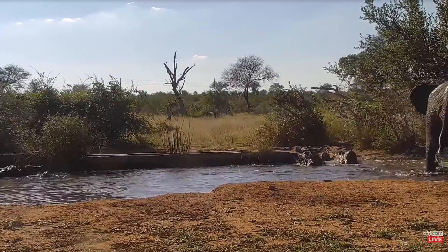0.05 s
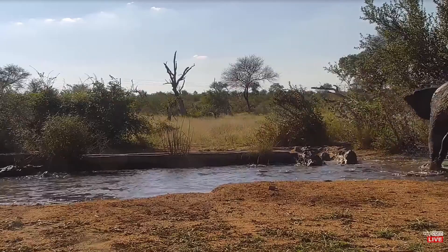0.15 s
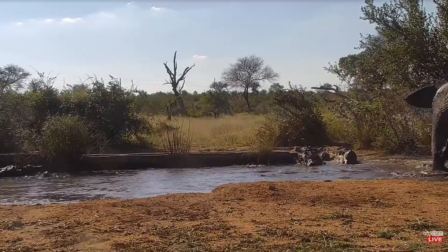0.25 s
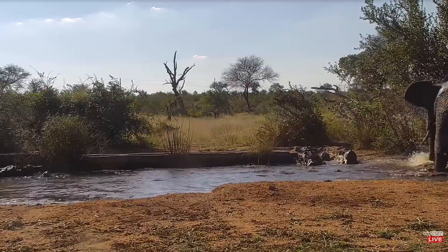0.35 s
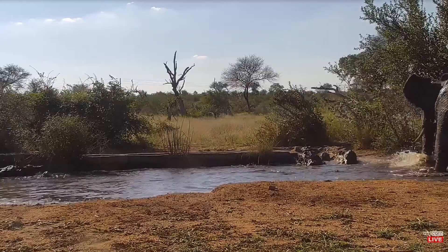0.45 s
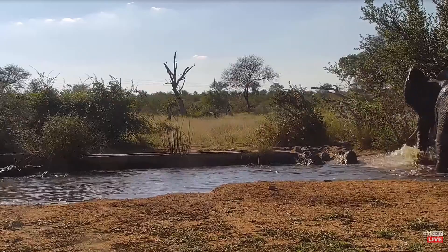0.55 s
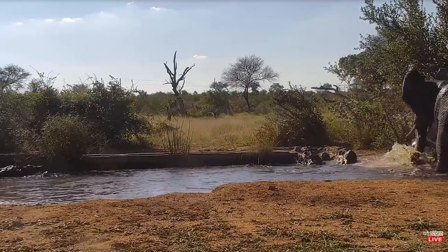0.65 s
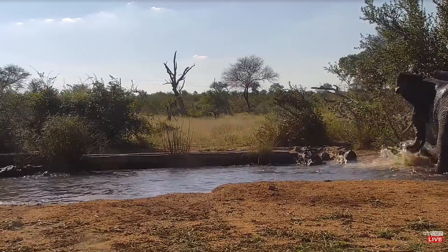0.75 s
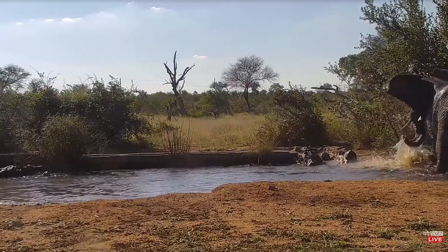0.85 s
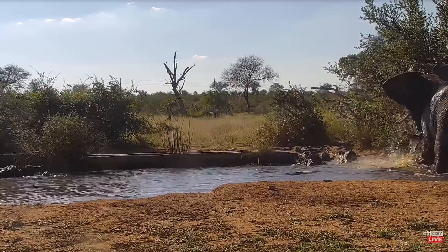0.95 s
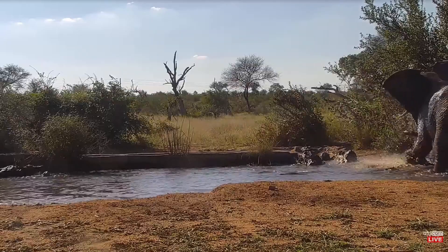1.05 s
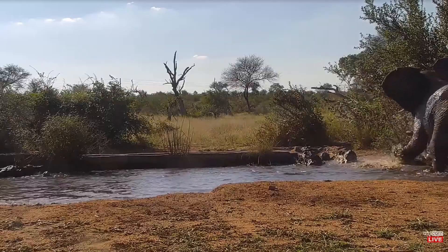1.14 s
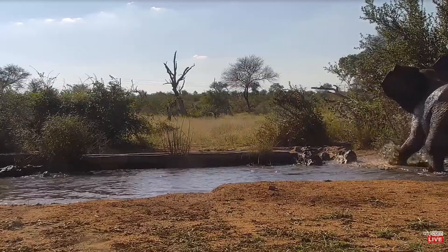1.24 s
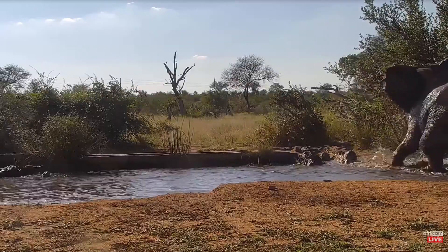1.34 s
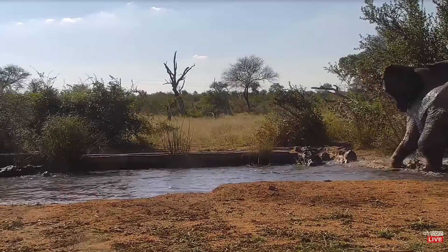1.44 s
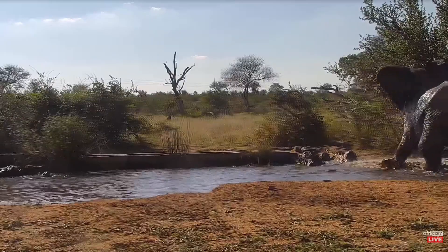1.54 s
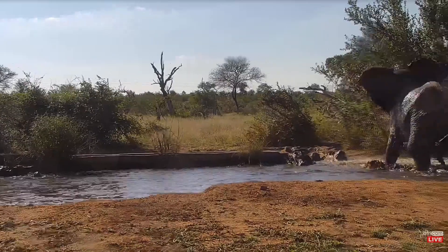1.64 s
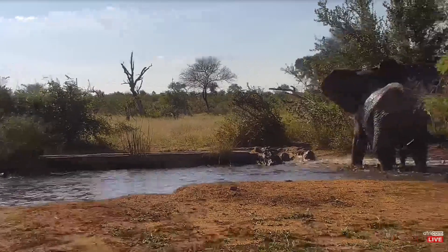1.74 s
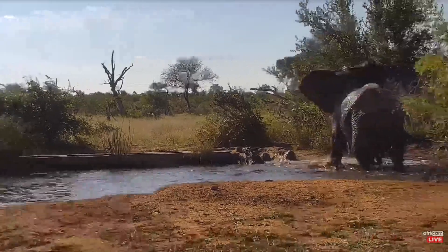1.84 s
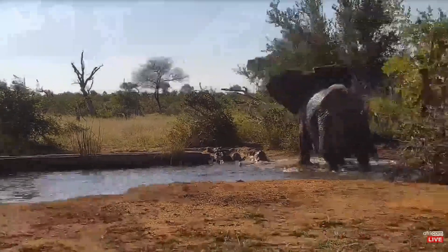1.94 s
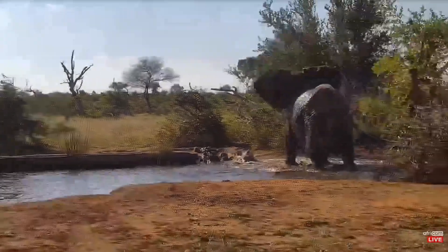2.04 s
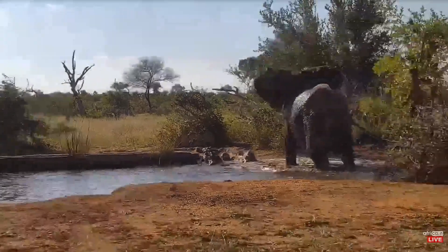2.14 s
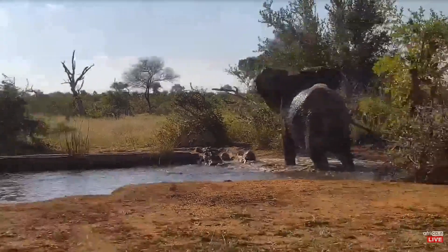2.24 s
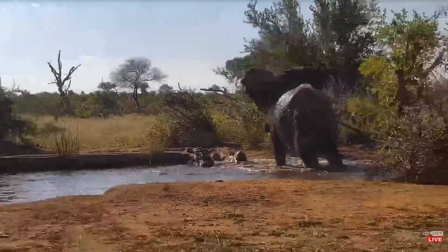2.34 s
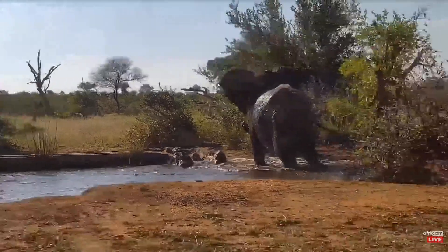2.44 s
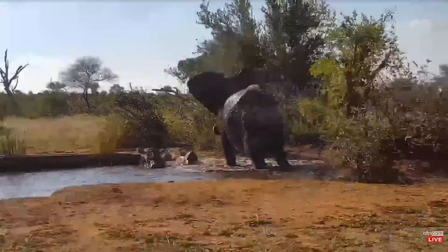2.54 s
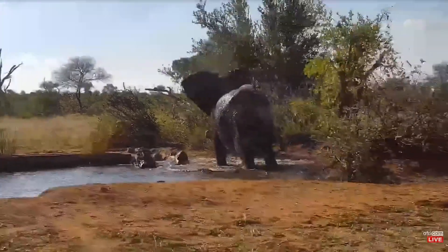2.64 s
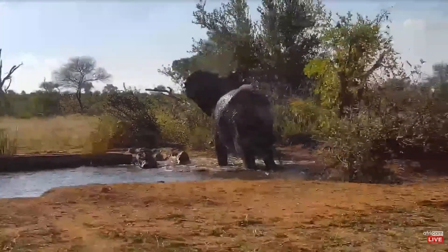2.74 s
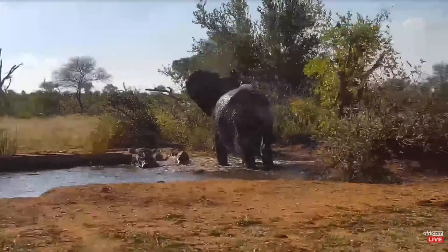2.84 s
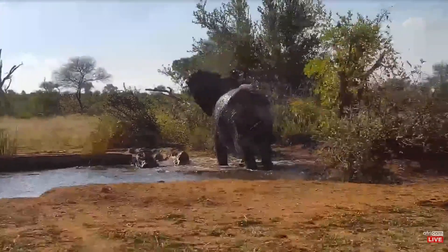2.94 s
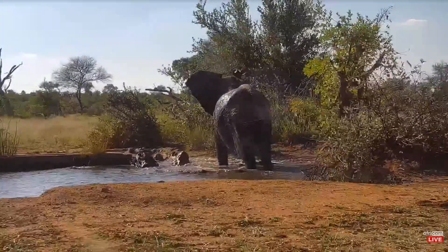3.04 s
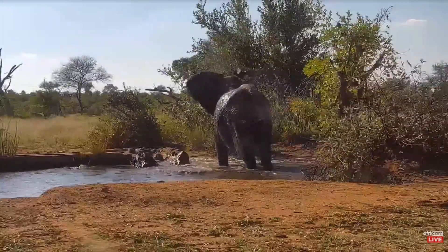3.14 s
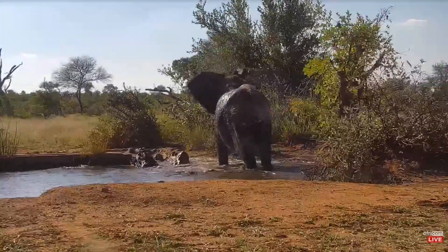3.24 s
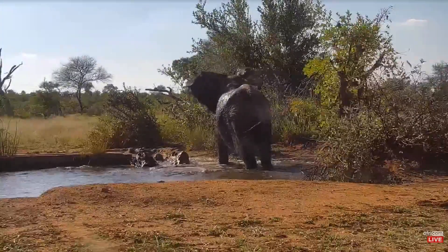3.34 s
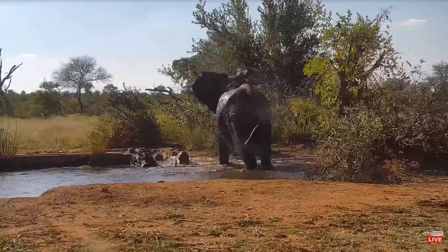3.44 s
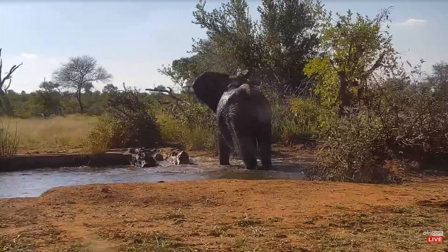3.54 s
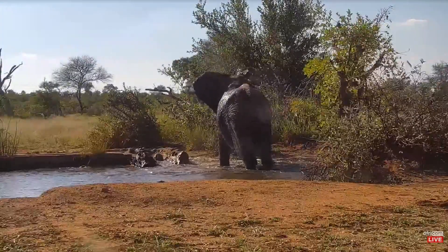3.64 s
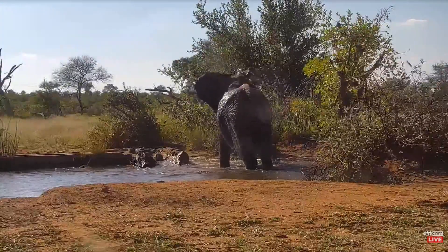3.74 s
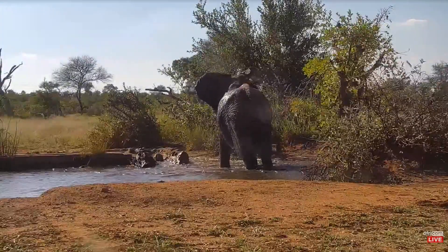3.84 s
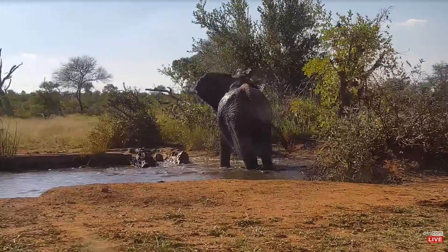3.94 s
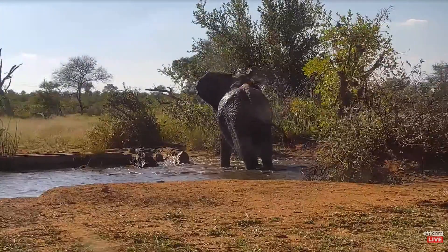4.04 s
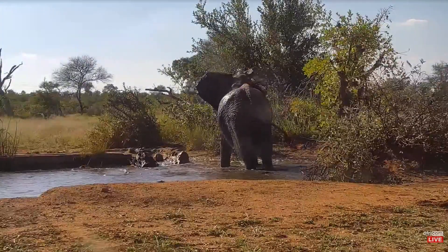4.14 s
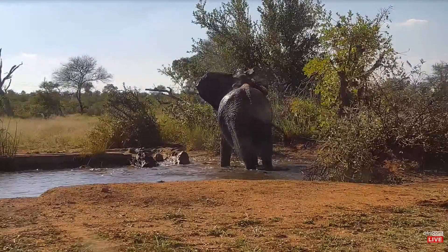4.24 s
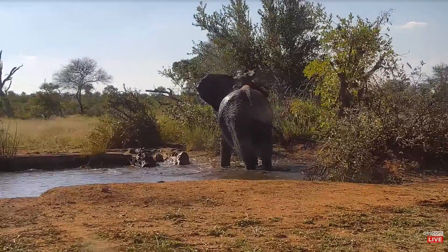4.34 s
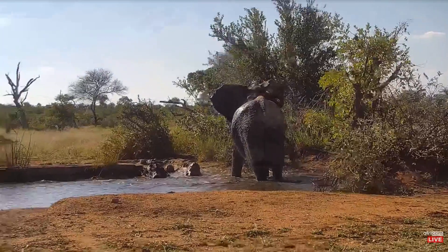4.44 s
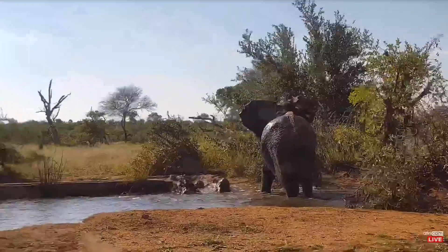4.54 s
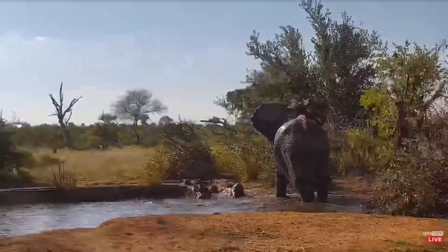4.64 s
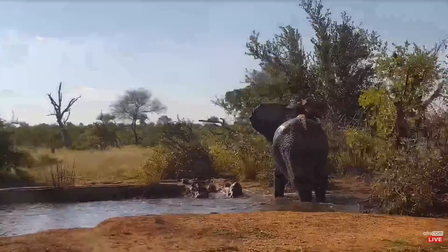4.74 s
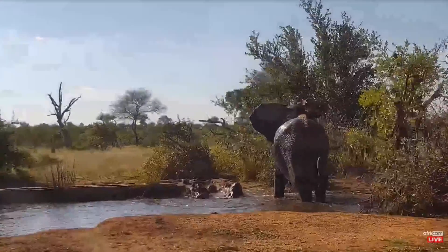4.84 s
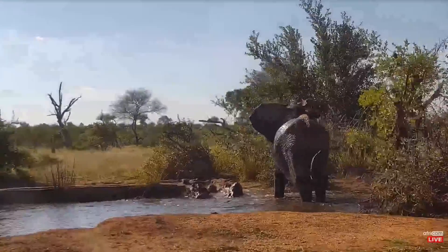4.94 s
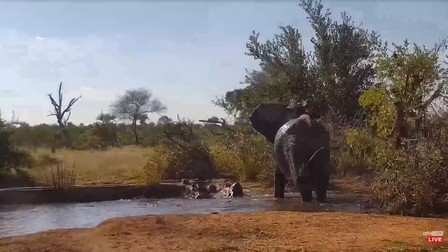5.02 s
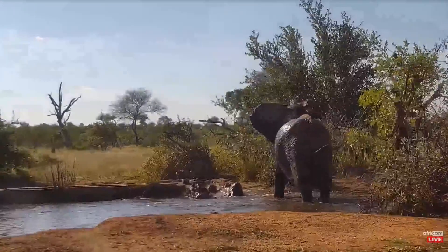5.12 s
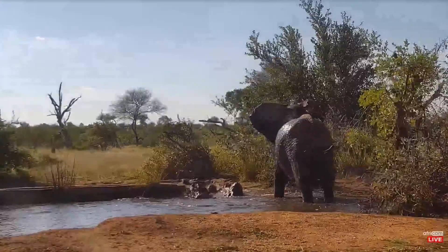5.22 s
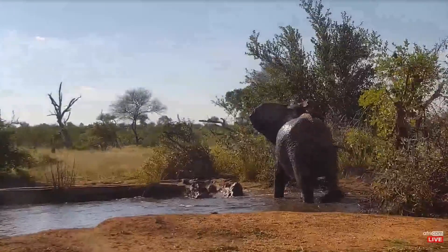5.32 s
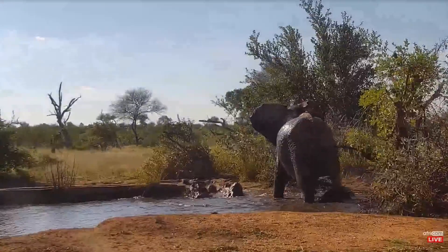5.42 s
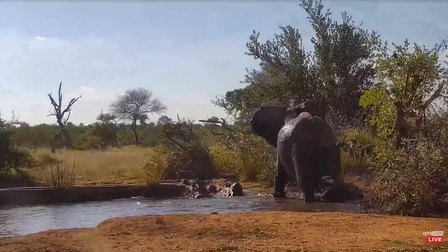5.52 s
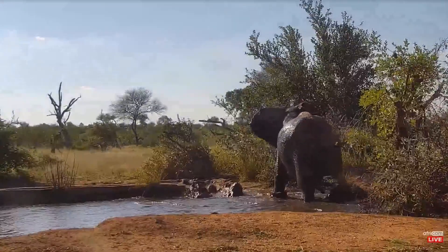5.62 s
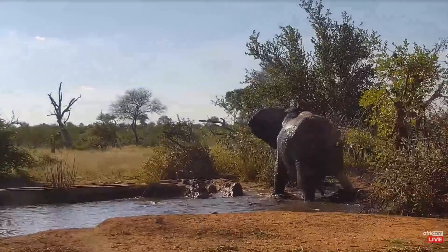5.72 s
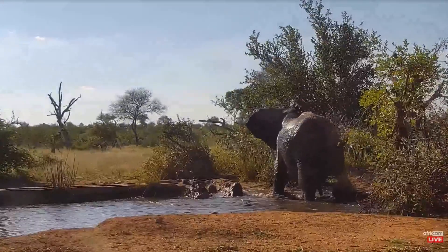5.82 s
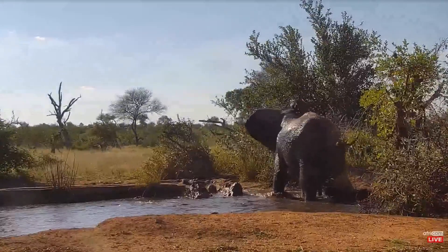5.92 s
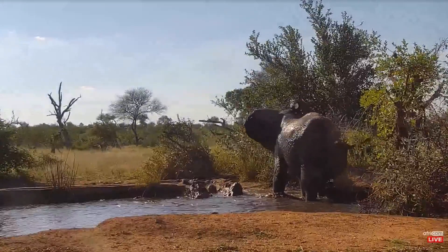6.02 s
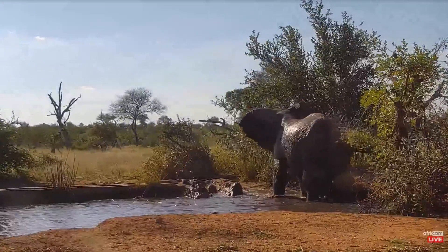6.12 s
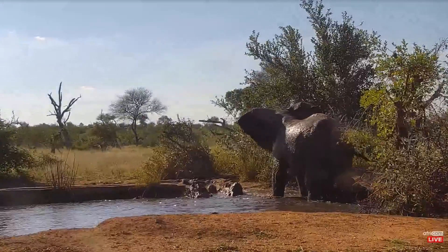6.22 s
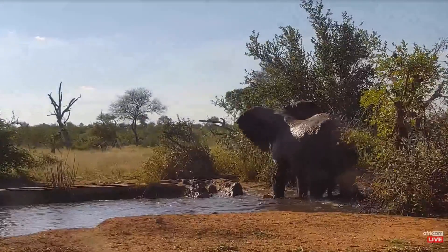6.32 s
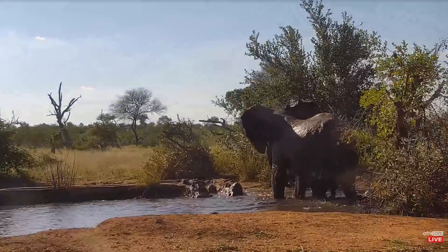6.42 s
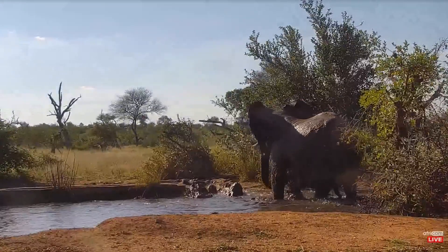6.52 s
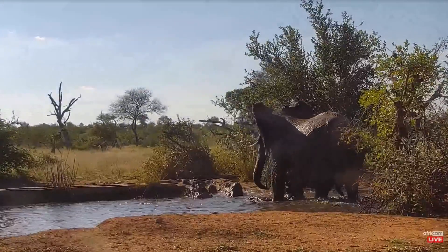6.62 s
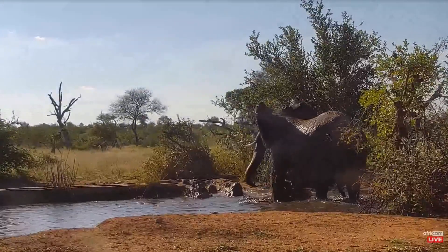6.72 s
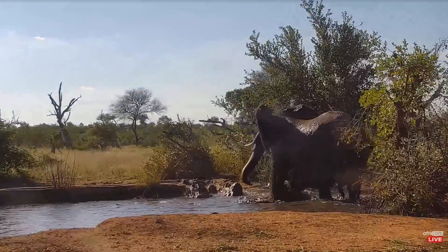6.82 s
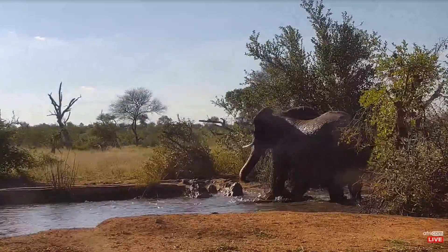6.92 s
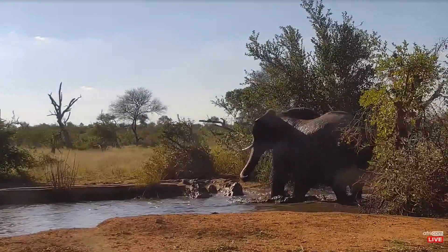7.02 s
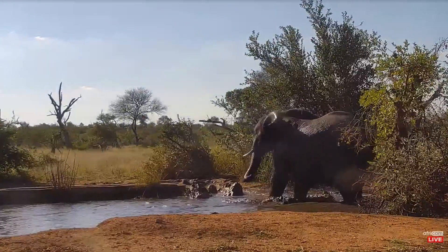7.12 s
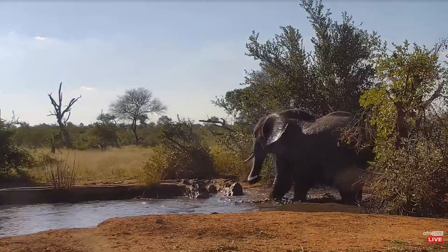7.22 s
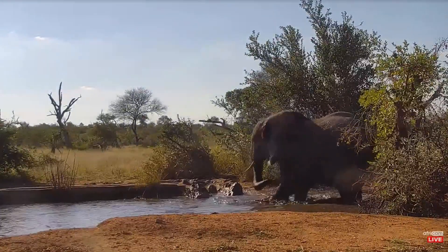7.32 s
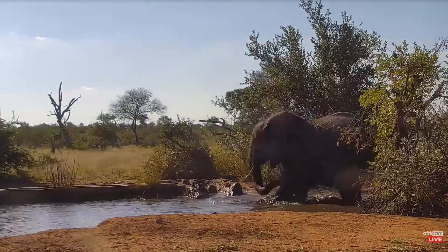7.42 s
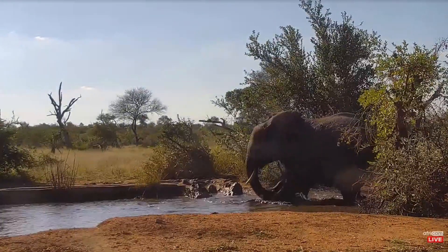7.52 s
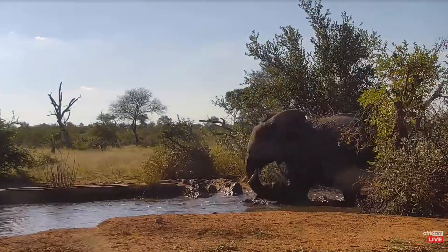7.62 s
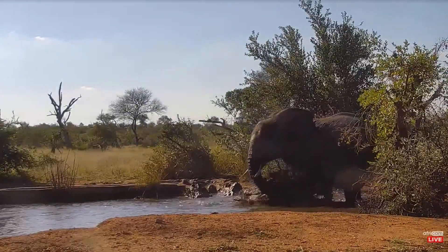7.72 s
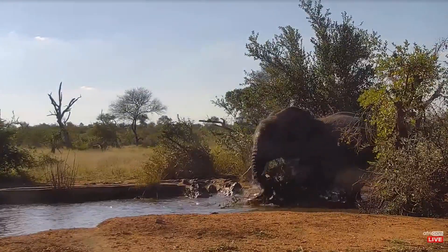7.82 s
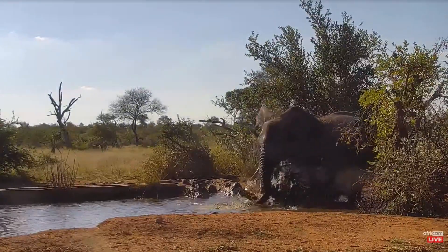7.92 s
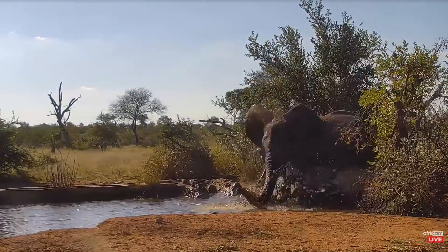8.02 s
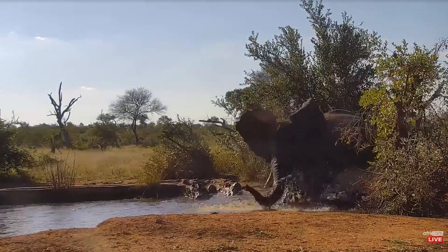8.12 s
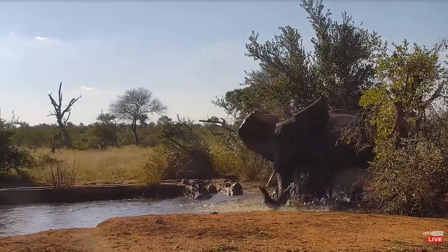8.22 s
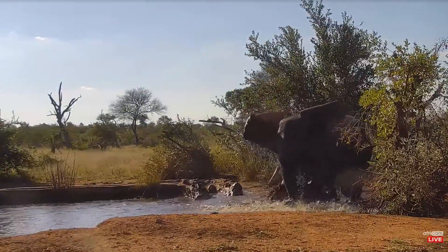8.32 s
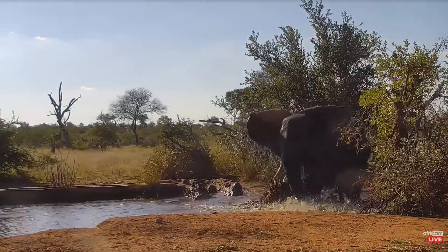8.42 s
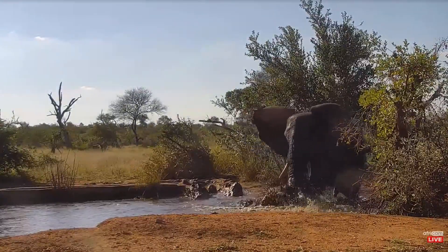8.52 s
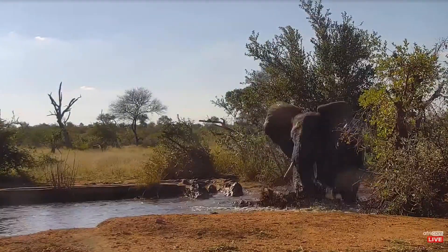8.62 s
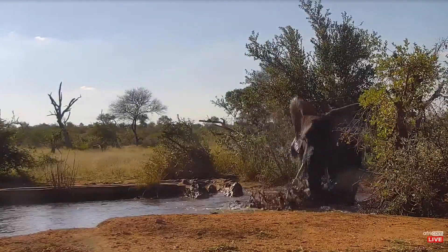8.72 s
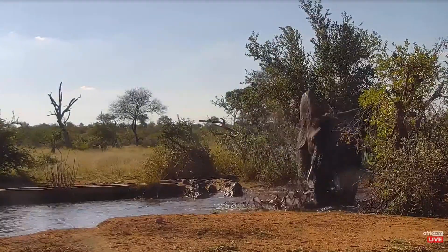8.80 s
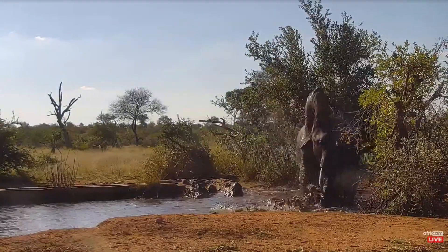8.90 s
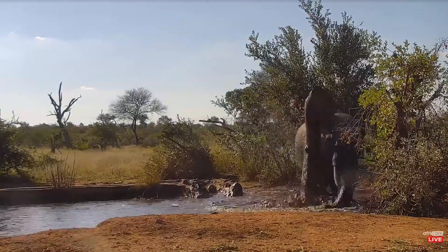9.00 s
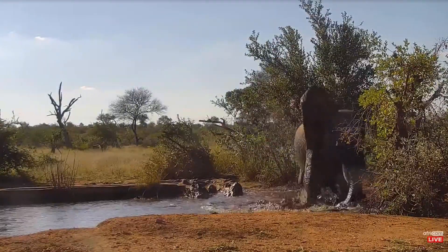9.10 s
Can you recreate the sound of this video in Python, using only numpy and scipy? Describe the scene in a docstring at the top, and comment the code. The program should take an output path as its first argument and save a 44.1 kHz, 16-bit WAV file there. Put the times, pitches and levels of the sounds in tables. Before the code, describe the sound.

Outdoor waterhole, microphone at a moderate distance with little bass and softened treble. Uneven splashes and bubbling gulps from wading legs come first, then a sparse calm of ringing drips, lapping and faint hiss. From about five and a half seconds strong strides churn the water again, with plops, gulps, a quick rising bloop and a dense spray of droplets before a last heavy slosh.

```python
"""Elephant wading in a waterhole

An elephant wades through shallow water, some way off across bare ground; ringing bubbles and filtered
noise make the froth of each stride, and short decaying sines make plops, gulps and drips.
While it stands, the water laps and drips under quiet outdoor air.
The colour tables hold the hollow near 600 Hz that the ground's reflection leaves.
"""
import sys
import numpy as np
from scipy import signal
from scipy.fft import rfft, irfft, next_fast_len
from scipy.io import wavfile
from scipy.ndimage import map_coordinates

SR = 44100
rng = np.random.default_rng(int(sys.argv[2]) if len(sys.argv) > 2 else 0)


def to_wav(sig):
    """Store sig (one row per channel, or 1-D mono) as 16-bit WAV at the path in sys.argv[1].

    Samples outside -1..1 are clipped; the rate is SR.
    """
    pcm = np.clip(np.atleast_2d(sig), -1, 1) * 32767
    pcm = np.round(pcm).astype(np.int16)
    wavfile.write(sys.argv[1], SR, pcm.T)  # frames by channels


N = 403956  # length in samples

# A leg or the trunk sweeps through the water: fastest moment t/s, slosh level/dB, churn level/dB,
# spray level/dB, swing up to that moment/s, settling time to -60 dB/s
STRIDES = [(.02, -57, -51.5, -63.5, 0.39, 4.7), (.55, -52.5, -49.5, -61, 0.49, 1.45),
           (.67, -69, -68, -59.5, 0.095, 2.2), (0.985, -48, -47, -58.5, 0.34, 2.6),
           (1.12, -59, -60, -63, 0.12, 0.39), (1.37, -48.5, -49, -65.5, 0.46, 1.2),
           (1.811, -55, -49.5, -64.5, 0.96, 1.76), (2.01, -77, -56, -69, 0.17, 0.58),
           (5.365, -56, -50.5, -76, 0.023, 2.7), (5.77, -50, -46.5, -61.5, 0.27, 2.6),
           (6.2, -50.5, -58, -68, 0.51, 2.5), (6.5, -54.5, -48, -62, 0.65, 0.74),
           (6.93, -52.5, -51, -66.5, 0.061, 2.1), (7.301, -51, -47.5, -62.5, 0.44, 2.36),
           (7.681, -51, -50.5, -62, 0.23, 2.8), (7.96, -64, -65, -56, 0.12, 2.8),
           (8.23, -54.5, -45.5, -54, 0.32, 1.9), (8.36, -65, -45.5, -51, 0.15, 1.04),
           (8.65, -47.5, -49, -61, 0.63, 0.86), (9.13, -51.5, -49.5, -58.5, 0.97, 2)]
# Lapping of the pool, before its random wavelets: t/s, churn level/dB
LAPPING = [(0, -55.5), (2.5, -66), (2.74, -61), (3.55, -63), (3.7, -66), (4.6, -67), (5.25, -69),
           (6.5, -58.5), (6.87, -60.5), (9.16, -53)]
# Slaps of falling water, before the bubbles fill them in: t/s, nominal peak level/dB, length/s
SLAPS = [(0.131, -28.5, 0.041), (0.874, -28, 0.019), (.978, -32.5, 0.019), (1.1, -33, 0.045),
         (1.341, -28, 0.018), (1.359, -29, 0.02), (1.514, -32.5, 0.028), (2.002, -34.5, 0.014),
         (3.796, -45.5, 0.077), (4.58, -47, 0.032), (5.331, -37.5, 0.041), (5.726, -30.5, 0.045),
         (5.785, -31, 0.037), (6.481, -38, 0.035), (6.595, -35, .016), (7.819, -32, 0.018),
         (8.125, -34, .035), (8.46, -28, 0.019)]
# Single bubbles: t/s, nominal peak level/dB, starting pitch f/Hz
PLOPS = [(.15, -32, 2100), (.168, -34, 1046), (0.434, -33, 1370), (.883, -37, 910), (1.138, -37, 1460),
         (1.343, -34.5, 1830), (2.378, -44, 1555), (2.746, -41, 1780), (2.772, -42, 1450),
         (2.79, -42, 1105), (2.81, -47, 1030), (3.095, -43, 1085), (3.171, -48, 910), (3.215, -37, 1093),
         (3.374, -40.5, 1340), (3.485, -42, 1260), (3.6, -43, 1340), (3.825, -47, 1010),
         (4.062, -42.5, 1150), (4.602, -47, 1900), (4.722, -48, 1076), (4.769, -47, 1220),
         (4.809, -44.5, 1520), (4.834, -48, 2600), (4.938, -45, 1570), (4.967, -48, 2740),
         (4.99, -39.5, 1330), (5.057, -45, 1360), (5.15, -39, 2300), (5.157, -37, 1370), (5.183, -42, 1360),
         (5.357, -37, 1144), (5.902, -30, 1620), (6.176, -29, 1230), (6.602, -32.5, 1516),
         (7.199, -37, 1030), (7.44, -31.5, 1170), (7.733, -32, 1184)]
# Big air pockets closing behind a leg, before tuning and colour: t/s, nominal level/dB, nominal f/Hz
GULPS = [(.162, -27.5, 313), (.268, -31, 300), (0.812, -28.5, 241), (0.977, -29, 306), (1.413, -21, 329),
         (1.91, -36, 330), (2.458, -37, 325), (2.528, -36.5, 344), (3.385, -38.5, 272), (3.491, -43, 290),
         (4.27, -43.5, 295), (4.614, -38, 320), (4.73, -38.5, 342), (5.402, -34, 321), (5.64, -25, 295),
         (5.764, -26.5, 308), (5.948, -31, 330), (6.72, -30.5, 270), (6.912, -28.5, 360), (6.96, -31, 330),
         (7.106, -27.5, 360), (7.228, -25, 338), (7.86, -25, 286), (8.088, -31, 339), (8.267, -26, 324),
         (8.461, -25, 318), (8.525, -28, 305), (8.63, -31, 293)]
# Drops that smack the surface and trap no air, before colour: t/s, nominal level/dB
SMACKS = [(2.378, -49), (2.4, -47), (4.065, -58), (5.22, -36.5), (1.137, -38)]
# Air pockets squeezed up to the surface: loudest moment t/s, peak level/dB, pitch at that moment f/Hz
BLOOPS = [(6.428, -38, 359), (8.178, -34, 415.5)]

# Colour of the froth, from the largest bubbles to the smallest: f/Hz, relative level/dB
SLOSH_COLOUR = [(30, -61), (60, -62), (95, -37), (125, -7.5), (185, -17), (250, -4), (310, 0), (365, -2),
                (430, -12), (520, -23), (700, -15), (1200, -80.5)]
CHURN_COLOUR = [(350, -40.5), (520, -10), (680, -18.5), (820, -11), (1100, -4), (1480, -1), (1750, -5.5),
                (2100, -9), (2800, -14), (4500, -37)]
FIZZ_COLOUR = [(1200, -52.5), (1900, 5), (2400, -4.5), (3000, -4), (3700, -7), (4400, -15), (5500, -23.5),
               (8000, -61.5)]
SPRAY_COLOUR = [(2800, -33), (4300, -6), (5200, -0.5), (6200, -1.5), (7000, -4.5), (8000, -5.5),
                (9200, -10.5), (10000, -16.5), (11000, -32)]
# Colour of steady outdoor air and microphone hiss: f/Hz, relative level/dB
AIR_COLOUR = [(25, -15), (60, -36), (90, -11.5), (125, -0.5), (170, -3), (300, 5.5), (420, -19),
              (600, -27.5), (1300, 0.5), (2500, -16.5), (4400, -17.5), (6000, -10), (8500, -10),
              (11000, -13)]
# Scatter from bank and bushes, cut off after a quarter second: f/Hz, fading time to -60 dB/s
BANK_FADING = [(200, 0.63), (1500, 0.51), (9000, 0.11)]
# Colours of the smaller sounds: f/Hz, relative level/dB
TRICKLE_COLOUR = [(500, -22.5), (1000, -1), (1500, 2.5), (3400, -12.5), (4500, -25.5)]
SPATTER_COLOUR = [(1000, -15), (3000, 0.5), (4400, -6), (5500, -7), (8000, -15), (11000, -25)]
RUMBLE_COLOUR = [(50, -26), (135, -2), (400, -19), (1000, -60)]
SLAP_COLOUR = [(100, -40), (300, -40), (650, -10.5), (1000, 3.5), (1450, 10.0),
               (2200, -0.5), (3400, -8.5), (4400, -18), (6000, -17.0), (10000, -29)]
GULP_COLOUR = [(50, -28.0), (120, 0.5), (240, 0.0), (450, -6.0), (700, -8.5)]
SMACK_COLOUR = [(600, -31), (1200, 0), (2200, 10.5), (3500, 1), (4600, -17), (10000, -23)]

TOP_HZ = 11130  # nothing is kept from here up
CALM_DB = -61.5  # churn of calm water
LAP_SLOSH_DB, LAP_SPRAY_DB = 1.5, -14  # lapping: slosh and spray against its churn
LAP_SWING_DB, LAP_RATE = 2.34, 7  # rise and fall of the wavelets; random points a second
FIZZ_DB, FIZZ_FOLLOWS_SPRAY = 2.5, 0.49  # fizz lies between churn and spray: offset, share of spray
# Trickle: level in calm water, dB per dB of churn, depth of the spurts
TRICKLE_DB, TRICKLE_GROWS, TRICKLE_CLUMP_DB = -67, 0.57, 2.5
SPATTER_DB, SPATTER_CLUMP_DB = -5.5, 5.5  # coarse drops: level against the spray, depth of the clumps
DRIP_DB, DRIP_GROWS = -48.5, 0.63  # strongest stray drops in calm water; dB per dB of churn
RUMBLE_S, RUMBLE_WIDTH_S, RUMBLE_DB = 4.55, 0.75, -71.5  # middle, half-width, level at the middle
PLOP_CYCLES = 42.4  # cycles (at the starting pitch) to fade by 60 dB
# Weaker bubbles of nearby pitch that follow a plop: time between them, change of level for each,
# scatter of pitch (natural log)
FOLLOW_S, FOLLOW_DB, FOLLOW_SPREAD = 0.007, -9, 0.16
SMACK_RISE_S, SMACK_T60_S = 0.0013, 0.017  # time constant of the rise; fading time to -60 dB
BLOOP_ROUGH = 0.81  # the pocket's wall quivers: scatter of phase in radians
# Time constant of the build-up, fading time to -60 dB, upward glide
BLOOP_SWELL_S, BLOOP_T60_S, BLOOP_OCTAVES_PER_S = 0.0087, 0.032, 30.2


def amp(db):
    """Turn decibels into gain."""
    return 10 ** (np.asarray(db) / 20)


def unit(x):
    """Scale a sound to an average (rms) level of 1."""
    return x / np.sqrt(np.mean(x ** 2) + 1e-20)


def along(points, hz):
    """Read (Hz, value) points at any frequency, on a log axis."""
    f, v = np.transpose(points)
    return np.interp(np.log(hz + 1), np.log(f + 1), v)


def curves(rows):
    """Give one value per sample for each column after the time."""
    s, *cols = np.transpose(rows)
    return [np.interp(np.arange(N) / SR, s, c) for c in cols]


def wobble(rate):
    """Draw a smooth random curve through rate random points a second."""
    points = rng.standard_normal(int(N * rate / SR) + 4)
    return map_coordinates(points, [np.arange(N) * rate / SR])


def fade(t, t60):
    """Die away exponentially, 60 dB down after t60 seconds."""
    return np.exp(-np.log(1000) * t / t60)


def add(track, s, sound):
    """Mix a sound into the track at time s."""
    part = track[max(round(s * SR), 0):][:len(sound)]
    part += sound[:len(part)]


def coloured(x, spectrum):
    """Filter with the gain of the (Hz, dB) points, with no sound ahead of its cause."""
    m = 2 * next_fast_len(N // 2 + SR // 4)
    gain = amp(along(spectrum, np.fft.rfftfreq(m, 1 / SR)))
    # folding the cepstrum forward in time gives a minimum-phase filter
    cepstrum = irfft(np.log(gain))
    cepstrum[1:m // 2] *= 2
    cepstrum[m // 2 + 1:] = 0
    return irfft(rfft(x, m) * np.exp(rfft(cepstrum)))[:N]


def bubble(t, hz, t60, rise, onset):
    """Ring an air bubble: it swells over onset cycles and its pitch climbs as it nears the surface."""
    ring = np.sin(2 * np.pi * hz * t * (1 + rise * t / t60 / 2))
    swell = 1 - np.exp(-t * hz / onset)
    return ring * fade(t, t60) * swell


def cloud(low_hz, high_hz, cycles, spread_db, count):
    """Gather bubbles of random size and strength at random moments, rms 1."""
    when, size, strength, life = rng.random((count, 4)).T
    hz = low_hz * (high_hz / low_hz) ** size
    t60 = cycles * (.5 + life) / hz  # small bubbles die sooner
    gain = amp(-spread_db * np.log(.01 + .99 * strength)) * hz
    lengths = (.6 * t60 * SR).astype(int)
    # lay all bubbles end to end: which bubble owns each sample, and how old it is
    owner = np.repeat(np.arange(count), lengths)
    age = np.arange(len(owner)) - (np.cumsum(lengths) - lengths)[owner]
    rings = gain[owner] * bubble(age / SR, hz[owner], t60[owner], rise=0.3, onset=0.23)
    # then sum them at their own places in time
    place = (when * N).astype(int)[owner] + age
    return unit(np.bincount(place, rings, N)[:N])


def froth(bubbles, rush_db, spectrum):
    """Lay a bubble cloud on the noisy rush of torn water, rms 1."""
    rush = amp(rush_db) * rng.standard_normal(N)
    return unit(coloured(bubbles + rush, spectrum))


def stirring():
    """Give slosh, churn and spray in dB: sweeps build as a limb swings, then settle into the lapping."""
    t = np.arange(N) / SR
    lap_db = curves(LAPPING)[0] + LAP_SWING_DB * wobble(LAP_RATE)
    power = amp([lap_db + LAP_SLOSH_DB, lap_db, lap_db + LAP_SPRAY_DB]) ** 2
    for s, *levels_db, swing, t60 in STRIDES:
        build = np.clip(1 + (t - s) / swing, 0, 1)
        sweep = build * fade(np.maximum(t - s, 0), t60)
        power += np.outer(amp(levels_db), sweep) ** 2
    return 10 * np.log10(power)


def droplets(churn_db, spray_db):
    """Small drops trickle off the hide in spurts; thrown spray comes down in coarse clumps."""
    trickle = cloud(940, 3440, cycles=11.5, spread_db=1.0, count=1300)
    trickle = unit(coloured(trickle * amp(TRICKLE_CLUMP_DB * wobble(25)), TRICKLE_COLOUR))
    spatter = cloud(2230, 8200, cycles=13, spread_db=0.5, count=3500)
    clumps_db = SPATTER_CLUMP_DB * np.tanh(wobble(60))
    spatter = unit(coloured(spatter * amp(clumps_db), SPATTER_COLOUR))
    trickle_db = TRICKLE_DB + TRICKLE_GROWS * (churn_db - CALM_DB)
    return trickle * amp(trickle_db) + spatter * amp(spray_db + SPATTER_DB)


def drips(churn_db, count, low_hz, high_hz, range_db):
    """Stray drops off the wet hide ring as bubbles at random, louder when the water is thrown about."""
    out = np.zeros(N)
    t = np.arange(SR // 12) / SR
    for when, size, weakness in rng.random((count, 3)):
        hz = low_hz * (high_hz / low_hz) ** size
        gain = amp(DRIP_DB - range_db * weakness) * np.sqrt(low_hz / hz)
        ring = bubble(t, hz, PLOP_CYCLES / hz, rise=0.17, onset=0.78)
        add(out, when * N / SR, gain * ring)
    return out * amp(DRIP_GROWS * (churn_db - CALM_DB))


def wading():
    """Strides stir four sizes of bubble and shed drops; calm water has fewer, more distinct bubbles."""
    slosh_db, churn_db, spray_db = stirring()
    fizz_db = churn_db + FIZZ_DB + FIZZ_FOLLOWS_SPRAY * (spray_db - churn_db)
    surge = wobble(22)  # wavelets break unevenly
    slosh = froth(cloud(152.8, 497, cycles=14.8, spread_db=0.86, count=2400), 0, SLOSH_COLOUR)
    dense = froth(cloud(750, 2810, cycles=19.0, spread_db=0.0, count=10000), 0, CHURN_COLOUR)
    sparse = cloud(700, 3000, cycles=22, spread_db=2.9, count=5500)
    sparse = unit(coloured(sparse, CHURN_COLOUR))
    busy = np.clip((churn_db + 66.5) / 12, .05, .95)  # dense froth's share of the power
    churn = np.sqrt(busy) * dense + np.sqrt(1 - busy) * sparse
    fizz = froth(cloud(2103, 4250, cycles=13.0, spread_db=-1.0, count=11000), 0.93, FIZZ_COLOUR)
    spray = froth(cloud(4360, 9340, cycles=8.9, spread_db=2.0, count=22000), 0, SPRAY_COLOUR)
    return (slosh * amp(slosh_db + 1.1 * wobble(11))
            + churn * amp(churn_db + 0.63 * surge)
            + fizz * amp(fizz_db + 1.06 * surge)
            + spray * amp(spray_db + 0.76 * surge + 1.0 * wobble(40))
            + droplets(churn_db, spray_db)
            + drips(churn_db, count=220, low_hz=974, high_hz=3260, range_db=8.5))


def outdoors():
    """Coloured noise gives still air and microphone hiss, with one slow swell of low rumble."""
    air = unit(coloured(rng.standard_normal(N), AIR_COLOUR))
    rumble = unit(coloured(rng.standard_normal(N), RUMBLE_COLOUR))
    swell = np.exp(-((np.arange(N) / SR - RUMBLE_S) / RUMBLE_WIDTH_S) ** 2)
    return amp(-64.5) * air + amp(RUMBLE_DB) * swell * rumble


def bank(x):
    """Bank and bushes scatter the sound into fading noise, drawn afresh every eighth of a second."""
    out = np.zeros(N)
    step = SR // 8
    for start in range(0, N, step):
        hz, t, z = signal.stft(rng.standard_normal(SR // 4), SR, nperseg=256)
        fading = fade(t, along(BANK_FADING, hz)[:, None])
        tail = signal.istft(z * fading, SR, nperseg=256)[1]
        echo = signal.fftconvolve(x[start:start + step], tail / np.linalg.norm(tail))
        add(out, start / SR, echo)
    return out


def slaps():
    """A sheet of water falls back and bursts into bubbles, a short swell of froth."""
    envelope = np.zeros(N)
    t = np.arange(SR // 3) / SR
    for s, db, length in SLAPS:
        u = t / (length / 2)  # the swell is fullest at u = 1
        add(envelope, s, amp(db - 13.5) * u * np.exp((1 - u * u) / 2))
    bubbles = cloud(832, 3880, cycles=45, spread_db=-4.0, count=8000)
    return envelope * froth(bubbles, 17, SLAP_COLOUR)


def plops():
    """A falling drop traps a ringing bubble, with two fainter ones of nearby pitch just after."""
    rings = np.zeros(N)
    t = np.arange(SR // 8) / SR
    for s, db, hz in PLOPS:
        add(rings, s, amp(db - 4.0) * bubble(t, hz, PLOP_CYCLES / hz, rise=0.15, onset=0.42))
        for k, (late, shift) in enumerate(rng.uniform(-1.01, 1, (2, 2)), 1):
            near_hz = hz * np.exp(FOLLOW_SPREAD * shift)
            follower = bubble(t, near_hz, PLOP_CYCLES / near_hz, rise=0.39, onset=0.86)
            add(rings, s + FOLLOW_S * (k + late / 2), amp(db - 2.0 + k * FOLLOW_DB) * follower)
    return rings


def gulps():
    """Large pockets of air swell and ring low and briefly."""
    out = np.zeros(N)
    t = np.arange(SR // 4) / SR
    for s, db, hz in GULPS:
        add(out, s, amp(db + 3.0) * bubble(t, hz * 0.967, 0.046, rise=0.2, onset=2.35))
    return coloured(out, GULP_COLOUR)


def smacks():
    """A heavy drop flattens on the surface with one short, dry tick of noise."""
    ticks = np.zeros(N)
    t = np.arange(-SR // 100, SR // 20) / SR
    shape = np.exp(np.minimum(t, 0) / SMACK_RISE_S) * fade(np.maximum(t, 0), SMACK_T60_S)
    for s, db in SMACKS:
        add(ticks, s + t[0], amp(db) * shape * rng.standard_normal(len(t)))
    return coloured(ticks, SMACK_COLOUR)


def bloops():
    """A pocket of air swells, glides quickly upward in pitch and breaks at the surface."""
    out = np.zeros(N)
    t = np.arange(-SR // 25, SR // 25) / SR
    shape = np.exp(np.minimum(t, 0) / BLOOP_SWELL_S) * fade(np.maximum(t, 0), BLOOP_T60_S)
    for s, db, hz in BLOOPS:
        phase = 2 * np.pi * np.cumsum(hz * 2 ** (BLOOP_OCTAVES_PER_S * t)) / SR
        quiver = BLOOP_ROUGH * wobble(220)[:len(t)]
        add(out, s + t[0], amp(db) * shape * np.sin(phase + quiver))
    return out


def scene():
    """Mix the water, its faint echo and the open air into one channel."""
    water = wading() + slaps() + plops() + gulps() + bloops()
    echo = amp(-12.0) * bank(water)
    return (water + smacks() + echo + outdoors())[None]


def record(dry):
    """Apply the microphone's bass roll-off, then a sharp treble limit."""
    m = next_fast_len(N + SR // 2)
    bass_cut = signal.butter(2, 90, "highpass", fs=SR, output="sos")
    thin = signal.sosfilt(bass_cut, dry)
    kept = np.fft.rfftfreq(m, 1 / SR) < TOP_HZ
    return irfft(rfft(thin, m) * kept, m)[:, :N]


dry = scene()
out = record(dry)
to_wav(out)
```